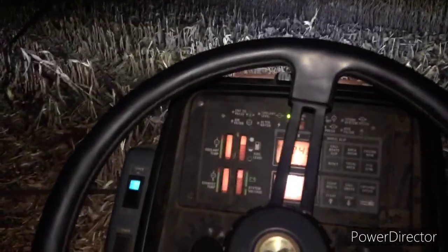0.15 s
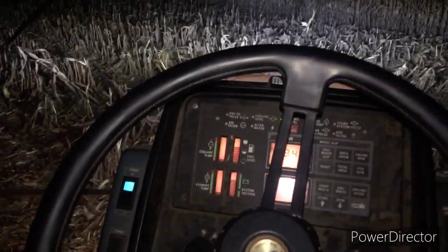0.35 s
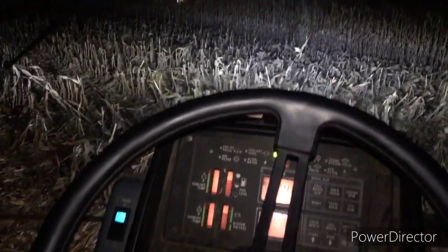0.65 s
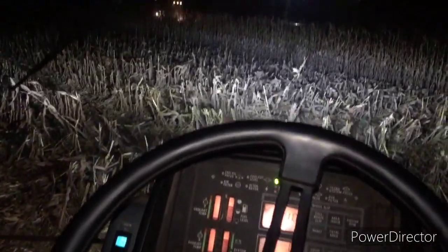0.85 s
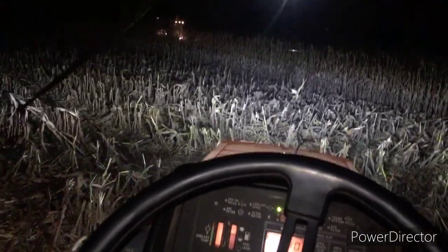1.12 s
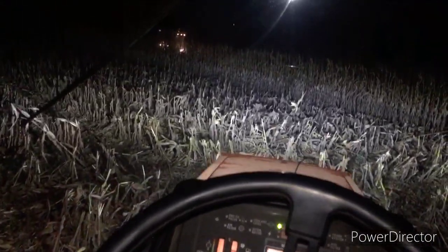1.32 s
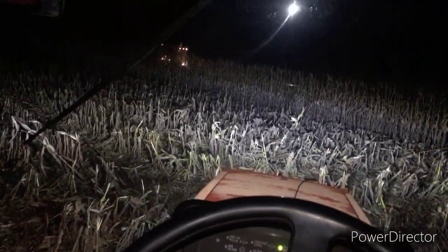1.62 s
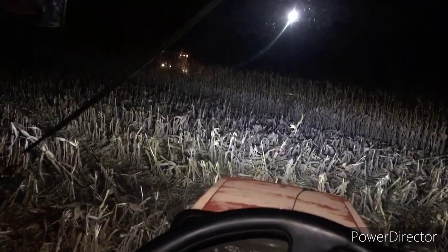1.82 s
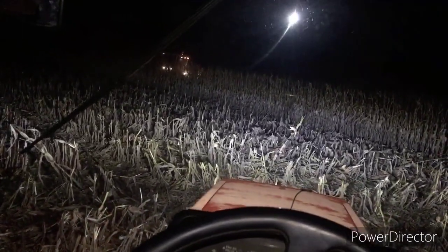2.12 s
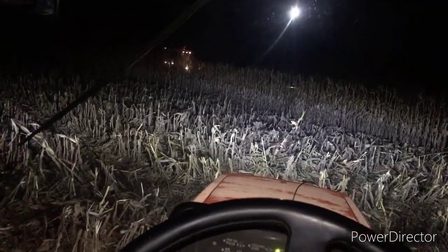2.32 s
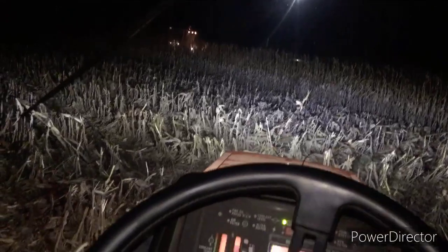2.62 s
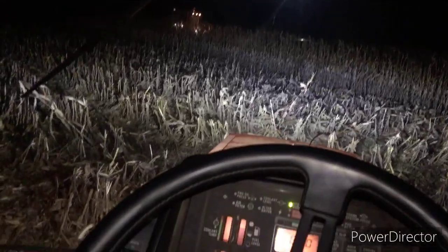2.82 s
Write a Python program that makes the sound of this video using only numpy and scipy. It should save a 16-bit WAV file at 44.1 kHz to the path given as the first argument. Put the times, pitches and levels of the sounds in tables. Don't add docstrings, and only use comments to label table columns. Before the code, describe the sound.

A diesel tractor idles throughout, heard at the driver's seat in a closed cab: a deep, even boom pulsing about forty-two times a second, with knocks, repeating valve clatter, gear hum and fan rush. A loose cover buzzes faintly, mostly in the first second. The low-mids thin slightly by 1.5 s. Close trim ticks at 0.3, 1.74 and, duller, 2.04 s; a tiny grainy squeak comes around 2.3-2.4 s.

```python
import sys
import numpy as np
from scipy import signal
from scipy.fft import rfft, irfft
from scipy.io import wavfile

SR = 44100
rng = np.random.default_rng(int(sys.argv[2]) if len(sys.argv) > 2 else 0)


def generate_wav(sig):
    pcm = np.round(np.clip(np.atleast_2d(sig).T, -1, 1) * 32767).astype(np.int16)
    wavfile.write(sys.argv[1], SR, pcm)


def boost(x):
    u = np.asarray(x, float) / 20
    return 10 ** u


N = 130095
CYLINDERS = 6


def rms_one(x):
    return x / np.sqrt(np.mean(x ** 2) + 1e-20)


def drift(rate):
    pole = np.exp(-80 * np.pi * rate / SR)
    noise = rng.standard_normal(N // 40 + 2002)
    slow = signal.lfilter([1], [1, -2 * pole, pole * pole], noise)[2000:]
    return np.interp(np.arange(N) / 40, np.arange(len(slow)), rms_one(slow))


def ring(clicks, hz, t60):
    r, w = boost(-60 / (t60 * SR)), 2 * np.pi * hz / SR
    return signal.lfilter([0, np.sin(w)], [1, -2 * r * np.cos(w), r * r], clicks + 1e-18)


def band_pass(x, low_hz, high_hz):
    return signal.sosfilt(signal.butter(3, [low_hz, high_hz], "band", fs=SR, output="sos"), x)


def at_hz(points, hz):
    point_hz, point_db = np.transpose(points)
    return np.interp(np.log(hz + 1), np.log(point_hz), point_db)


# centre_hz, width_hz, lift_db
CAB = [(115.5, 18.5, 13.5), (165, 51, 2.5), (232, 49, 2), (302, 25, -7.5), (357, 30, 2), (503, 32, 5),
       (599, 48, 4.5), (760, 28, -5.5), (956, 130, 4), (1266, 25, 2), (1513, 480, 3.5), (1850, 21, -6),
       (2190, 680, 2.5),
       (3740, 480, 2), (4550, 170, 3.5), (5570, 60, 6), (5910, 59, 10.5), (6200, 55, 6.5),
           (7300, 57, 3), (9200, 620, 4), (11600, 100, 8)]


def colour(x, spectrum):
    hz = np.arange(N // 2 + 1) * SR / N
    db = at_hz(spectrum, hz)
    for centre_hz, width_hz, lift_db in CAB:
        db = db + lift_db / (1 + (2 * (hz - centre_hz) / width_hz) ** 2)
    return rms_one(irfft(rfft(x) * boost(db) * (hz > 20), N))


def crank():
    firing_hz, speedup_hz_per_s, first_firing = 42.2175, .0238, -.3466
    hunt_firings, hunt_per_s = .006, 1.5
    t = np.arange(N) / SR
    firings = first_firing + firing_hz * t + speedup_hz_per_s * t ** 2 / 2
    return (firings + hunt_firings * drift(hunt_per_s)) / CYLINDERS


# multiple_of_firing_rate, level_db, lead_firings
PULSE = [(1.5, -40, .31), (2, -37.4, .12), (3, -39.7, .04)]


def boom(cycle):
    swell_share, swell_lead_rad = .21, 1.22
    sway_rad, sway_lead_rad = .14, 2.19
    turn = 2 * np.pi * cycle
    swell = 1 + swell_share * np.cos(turn + swell_lead_rad)
    sway = sway_rad * np.sin(turn + sway_lead_rad)
    out = boost(-20.5) * swell * np.cos(CYLINDERS * turn + sway)
    for k, db, lead in PULSE:
        out += boost(db) * np.cos(k * (CYLINDERS * turn + 2 * np.pi * lead))
    return np.sqrt(2) * out


KNOCK_DB = [6, -1, -1, -4.5, -8, 0]


def knock_gate(cycle):
    lag_firings, rise_s, decay_s, scatter_db = .31, .0023, .019, 1.8
    count = np.floor(cycle * CYLINDERS - lag_firings).astype(int)
    fired = np.diff(count, prepend=count[0]) > 0
    strength = boost(KNOCK_DB)[count % CYLINDERS] * boost(scatter_db * rng.standard_normal(N))
    fall, rise = np.exp(-1 / (decay_s * SR)), np.exp(-1 / (rise_s * SR))
    decays = signal.lfilter([1], [1, -fall], fired * strength)
    return 1 + signal.lfilter([1 - rise], [1, -rise], decays)


# share_of_cycle, ring_hz, peak_db, t60_s
CONTACTS = [(.105, 283, -26.5, 0.023), (0.071, 630, -45, 0.021), (0.15, 632, -37, 0.041),
            (0.68, 470, -30, 0.019), (0.098, 980, -37, 0.0087), (.4, 970, -29.5, 0.012),
            (0.79, 1101, -32.5, 0.046), (0.78, 652, -36, 0.032), (0.032, 1850, -36.5, 0.044),
            (.1, 170, -40, 0.053)]


def contacts(cycle):
    out = np.zeros(N)
    for share, hz, db, t60 in CONTACTS:
        count = np.floor(cycle - share)
        hit = np.diff(count, prepend=count[0]) > 0
        clicks = hit * boost(db + 1.5 * rng.standard_normal(N))
        soft = signal.lfilter(*signal.butter(2, 1.5 * hz, fs=SR), clicks + 1e-18)
        out += ring(soft, hz, t60)
    return out


# start_s, peak_db, ring_hz, t60_s
COVER = [(.02, -40, 2310, .2), (.064, -44, 2310, .1), (.018, -50, 3600, .08), (.205, -45, 2320, .08),
         (.42, -45, 2300, .08), (.492, -43, 2300, .08), (.543, -50, 3780, .07), (.728, -38, 2310, .3),
         (.877, -44, 2310, .1), (1.744, -43, 2290, .15), (2.155, -44, 2400, .08), (2.862, -50, 3750, .08)]


def cover():
    out = np.zeros(N)
    for s, db, hz, t60 in COVER:
        click = np.zeros(N)
        click[int(s * SR)] = boost(db) / 2
        out += ring(click, hz, t60) + ring(click, 1.01 * hz, .6 * t60)
    return out


# frequency_hz, level_db (per Hz)
CLATTER = [(55, -18), (160, -3.5), (270, -4), (900, -9.5), (1700, -14.5), (2500, -24), (3300, -36),
           (11000, -75)]


def clatter(cycle, gate):
    size = 4096
    one_turn = rng.standard_normal(size)
    closed = np.append(one_turn, one_turn[0])
    loop = np.interp(cycle % 1 * size, np.arange(size + 1), closed)
    return boost(-35.5) * colour(loop * gate, CLATTER)


# multiple_of_cycle_rate, level_db
ORDERS_DB = [(10, -49), (11, -52.5), (15, -57), (17, -54.5), (22, -46.5), (24, -48), (28, -47.5),
             (33, -56.5), (34, -47), (38, -45.5), (39, -50), (51, -60), (54, -50), (82, -56), (86, -50),
             (87, -51), (108, -66), (117, -51.5), (120, -59), (123, -46.5), (126, -56), (129, -52),
             (135, -46), (148, -51), (183, -53), (201, -53.5), (328, -59.5)]
# pitch_hz, level_db
TONES = [(74.8, -52), (92.8, -54.5), (297.5, -38.5), (446.2, -64), (595.0, -47), (637.2, -56.5),
         (701.2, -56.5), (744.0, -49.5), (786.0, -65), (892.5, -50), (1157.5, -50), (1758.5, -54.5),
         (2097.2, -58)]


def hum(cycle):
    out = np.zeros(N)
    for k, db in ORDERS_DB:
        out += boost(db + .37 * drift(5.1)) * np.sin(2 * np.pi * (k * cycle + rng.random()))
    seconds = cycle / 7.0421
    for hz, db in TONES:
        out += boost(db + .8 * drift(2.8)) * np.sin(2 * np.pi * (hz * seconds + rng.random()))
    return np.sqrt(2) * out


# multiple_of_cycle_rate, level_db
FAINT_ORDERS_DB = [(20, -52), (29, -52.5), (30, -58), (32, -54), (40, -52), (41, -54), (42, -49.5), (48, -55),
                   (50, -53), (120, -53.5)]


def faint_orders(cycle):
    out = np.zeros(N)
    for k, db in FAINT_ORDERS_DB:
        out += boost(db) * np.sin(2 * np.pi * (k * cycle + rng.random()))
    return np.sqrt(2) * out


# start_s, peak_db, lowest_hz, highest_hz, decay_s
TICKS = [
    (1.7425, -53, 13000, 15900, .001),
    (1.7425, -47, 5000, 7500, .0015),
    (1.7465, -48, 9000, 15900, .002),
    (1.751, -60, 11000, 15900, .012),
    (2.0365, -35, 2200, 3900, .004),
    (2.043, -37, 1800, 3200, .004),
    (.3025, -51, 4000, 7500, .004),
]


def trim_ticks():
    t, out = np.arange(N) / SR, np.zeros(N)
    for s, db, low_hz, high_hz, decay_s in TICKS:
        decay = (t > s) * np.exp(-np.maximum(t - s, 0) / decay_s)
        snap = band_pass(rng.standard_normal(N) * decay + 1e-18, low_hz, high_hz)
        out += boost(db) * snap / abs(snap).max()
    return out


# start_s, length_s, pitch_hz, level_db, width_hz
SLIPS = [(2.283, .028, 6350, -56, 400), (2.29, .02, 7100, -62, 500), (2.314, .022, 6400, -56, 400),
         (2.312, .03, 7250, -55, 500), (2.335, .03, 7200, -58, 900), (2.328, .022, 14000, -59, 1500),
         (2.328, .02, 15500, -65, 500), (2.355, .022, 14100, -61, 1200), (2.357, .02, 15500, -64, 500),
         (2.36, .034, 9550, -52.5, 800), (2.362, .035, 12000, -60, 900), (2.396, .024, 13500, -64, 2500)]


def trim_squeak():
    start_s, rise_s, hold_s, fall_s = 2.31, .045, .025, .05
    grains_per_s = 2500
    t = np.arange(N) / SR
    grains = rng.standard_normal(N) * (1 + 1.6 * (rng.random(N) < grains_per_s / SR))
    corners = start_s + np.cumsum([0, rise_s, hold_s, fall_s])
    pressure = np.interp(t, corners, [0, 1, 1, 0])
    high_pass = signal.butter(4, 6500, "high", fs=SR, output="sos")
    rub = rms_one(signal.sosfilt(high_pass, grains))
    out = boost(-54.5) * rub * pressure * boost(2.5 * drift(30))
    for s, length, hz, db, width_hz in SLIPS:
        swell = np.sin(np.pi * np.clip((t - s) / length, 0, 1))
        out += boost(db) * swell * rms_one(ring(grains, hz, 2.2 / width_hz))
    return out


# frequency_hz, level_db (per Hz)
RUSH = [(40, -14), (90, -6.5), (300, -5), (1000, -14), (2400, -21.5), (2900, -28), (7000, -38.5),
        (16000, -59.5)]
# octaves_above_30_hz, share
FOLLOWS = [(2, .1), (6, .7), (7.5, .4), (8.5, .1)]


def rush(gate):
    whole = rfft(colour(rng.standard_normal(N), RUSH))
    octave = np.log2(np.arange(len(whole)) * SR / N / 30 + 1e-9)
    out = np.zeros(N)
    for k in range(10):
        band = irfft(whole * np.clip(1 - abs(octave - k), 0, 1), N)
        share = np.interp(k, *np.transpose(FOLLOWS))
        out += band * rms_one(gate ** share) * boost(.16 * drift(21))
    return boost(-34.5) * out


# time_s, lift_db
TILT = [
    (0, 1.5),
    (.4, 2),
    (1.0, 1.5),
    (1.5, -1.5),
    (2.95, -.5),
]


def scene():
    cycle = crank()
    gate = knock_gate(cycle)
    engine = hum(cycle) + contacts(cycle) + clatter(cycle, gate) + rush(gate) + cover()
    low_mid = signal.lfilter(*signal.butter(1, [296, 550], "band", fs=SR), engine)
    tilt = boost(np.interp(np.arange(N) / SR, *np.transpose(TILT))) - 1
    mix = boom(cycle) + engine + tilt * low_mid + trim_ticks() + trim_squeak() + faint_orders(cycle)
    return mix[None]


def top_cut(x):
    return signal.sosfilt(signal.butter(12, 15750, fs=SR, output="sos"), x)


def record(dry):
    return top_cut(dry)


dry = scene()
out = record(dry)
generate_wav(out)
```